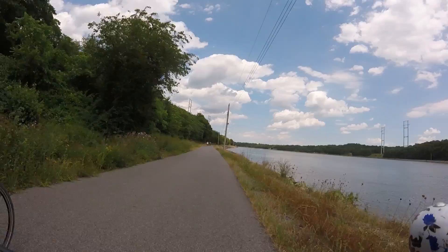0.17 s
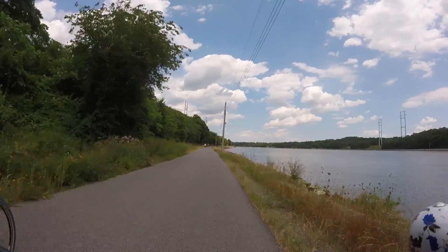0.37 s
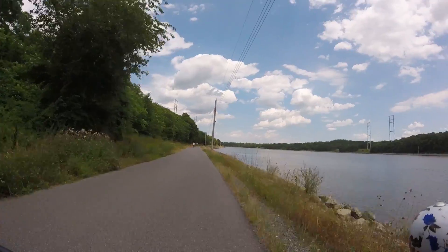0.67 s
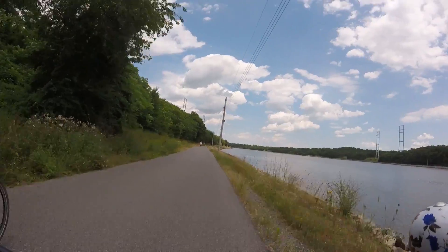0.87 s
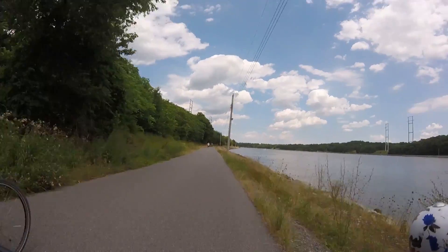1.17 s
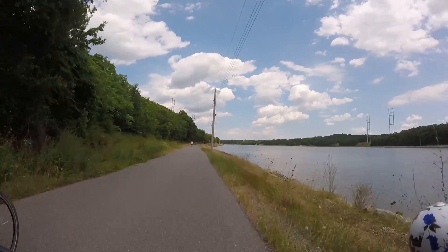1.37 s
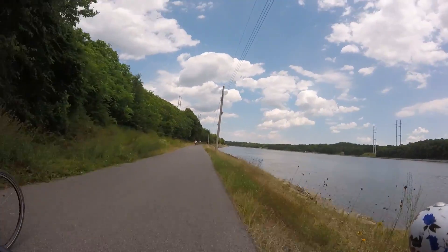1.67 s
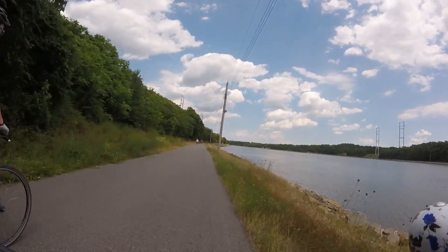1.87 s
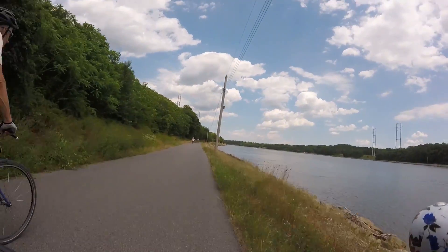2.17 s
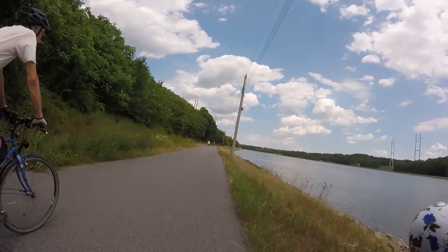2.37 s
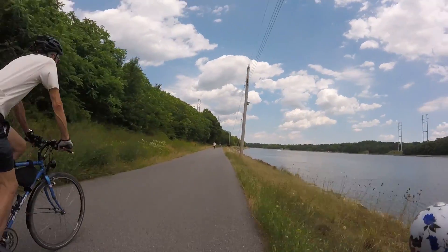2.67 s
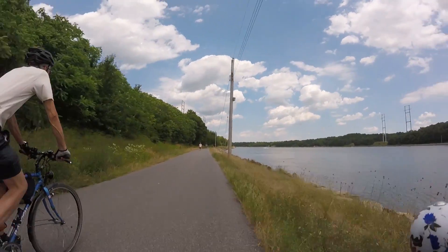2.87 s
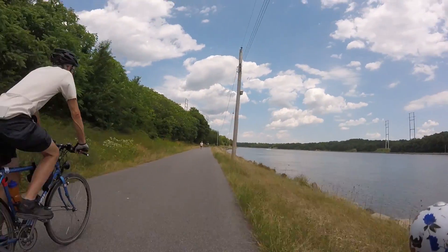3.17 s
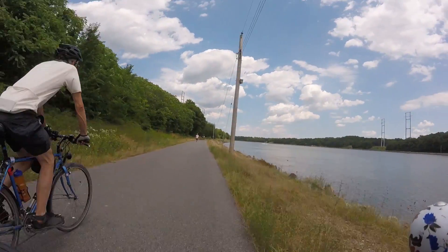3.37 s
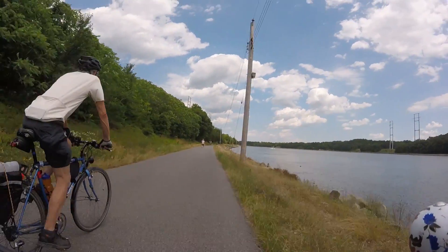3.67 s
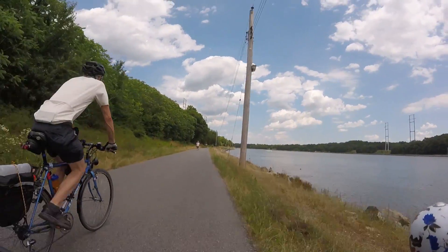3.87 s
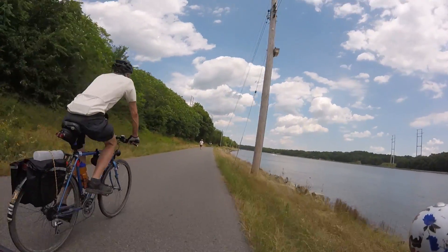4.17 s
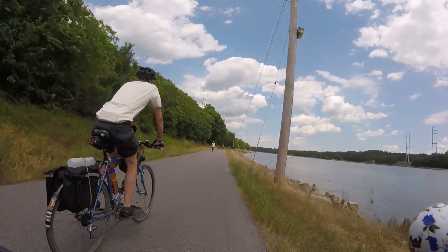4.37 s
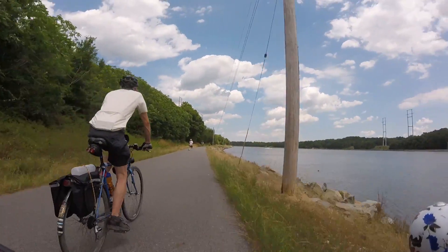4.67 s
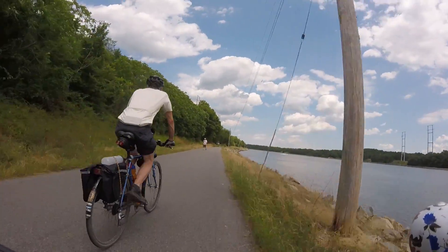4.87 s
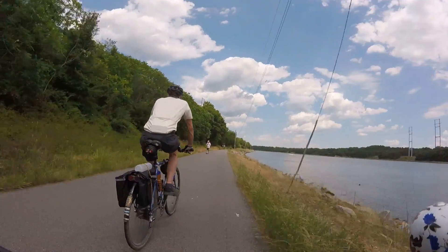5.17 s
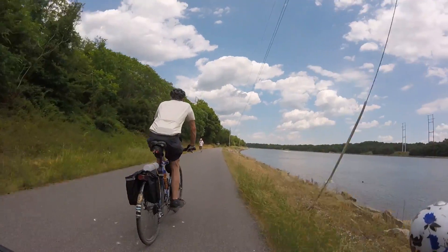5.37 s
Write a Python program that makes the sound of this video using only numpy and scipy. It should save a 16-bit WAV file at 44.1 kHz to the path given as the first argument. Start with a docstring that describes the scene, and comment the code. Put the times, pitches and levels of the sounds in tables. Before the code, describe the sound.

A bicycle rides along an asphalt path, heard from a microphone on the bike that is buffeted throughout by deep, uneven wind. The steady hum of the tyres comes through the frame underneath, with soft chain ticking and hiss and scattered small rattles. Two brief jolts come as the wheel crosses cracks, one early and one late, and in the second half a pedal clicks faintly with each turn.

```python
"""Low wind thumps and flutters right on the port of a microphone mounted on a moving bicycle. Under it the
tyres, rolling on smooth lakeside asphalt, hum through the frame and the mount. Close by, the chain sizzles and
ticks over the sprocket teeth and a loose fitting rattles. The frame takes a hard knock, the wheel jolts over a
crack, and in the second half a pedal clicks once a crank turn."""
import sys
import numpy as np
from scipy import signal
from scipy.fft import rfft, irfft
from scipy.io import wavfile
from scipy.ndimage import uniform_filter1d

SR = 44100
rng = np.random.default_rng(int(sys.argv[2]) if len(sys.argv) > 2 else 0)


def inscribe(sig):
    """Save sig as 16-bit PCM at rate SR to the path in sys.argv[1].

    A 1-D sig is mono; a 2-D sig holds one channel per row.
    Samples are clipped to [-1, 1] before scaling.
    """
    pcm = np.round(np.clip(np.atleast_2d(sig).T, -1, 1) * 32767)
    wavfile.write(sys.argv[1], SR, pcm.astype(np.int16))


N = 243873
TIME = np.arange(N) / SR

# Wind on the port between thumps. Each row: time in seconds, buffet, flutter and rush levels in dB.
WIND_LEVELS = [(0, -17, -28.5, -32.5), (.2, -25.5, -29, -44), (.35, -23.5, -22, -38),
               (.95, -13, -29.5, -35), (1.3, -23, -26.5, -39), (1.6, -21, -29.5, -39),
               (2.0, -19.5, -31.5, -42), (2.6, -20.5, -28.5, -39.5), (2.85, -19.5, -31, -43),
               (3.35, -19, -27.5, -39.5), (3.8, -18, -30, -41), (4.3, -20, -25, -34.5),
               (5.0, -22, -27.5, -41), (5.3, -20.5, -41.5, -48), (5.53, -21.5, -26, -44.5)]
# The wind's highest band between thumps. Each row: time in seconds, level in dB.
UPPER_RUSH_LEVELS = [(0.0, -42), (0.34, -47), (0.52, -43.5), (1.15, -42), (1.45, -44.5), (1.8, -42),
                     (1.96, -43), (2.2, -41.5), (2.39, -43), (2.59, -46), (3.73, -44), (4.28, -42.5),
                     (4.84, -45.5), (5.53, -44)]
# Four wind bands, deepest first. Each row: frequency in Hz, relative density in dB.
BUFFET_SPECTRUM = [(8, 8.5), (14, -3), (27, 2.5), (43, -2), (68, -12), (110, -25.5), (200, -90)]
FLUTTER_SPECTRUM = [(40, -15), (65, 7.5), (85, 1.5), (130, -9.5), (200, -67)]
RUSH_SPECTRUM = [(90, -7.5), (140, -0.5), (190, -6), (240, -12.5), (330, -28)]
UPPER_RUSH_SPECTRUM = [(150, -35), (215, -2.5), (320, -1.5), (430, -10), (700, -13.5)]
# Eddies hitting the port. Each row: centre and half length in seconds, pitch in Hz,
# then swing, flutter and rush levels in dB.
EDDIES = [(0.338, 0.013, 37, -12, -26, -32), (0.405, 0.013, 31, -10.5, -33, -27),
          (0.51, 0.015, 34, -14, -28, -52), (0.684, 0.027, 22, -19, -22.5, -30.5),
          (0.837, 0.028, 41, -13.5, -31, -39), (0.874, 0.013, 22, -15, -34, -52),
          (0.965, 0.025, 20.0, -11, -40, -45), (1.004, 0.036, 20, -16.5, -48, -28),
          (1.367, 0.014, 52, -11, -18, -42), (1.44, 0.013, 27, -12.5, -17, -37),
          (1.527, 0.013, 46, -13, -27, -50), (1.597, 0.015, 44, -15, -21, -48),
          (1.655, 0.029, 45.6, -14.4, -17.5, -42), (1.691, 0.027, 27, -12.5, -19.5, -29),
          (1.837, 0.021, 54, -19.5, -19, -40), (2.091, 0.028, 30.2, -13, -46, -58),
          (2.26, 0.017, 43, -14.5, -24, -29), (2.532, 0.015, 34, -18, -22, -35),
          (2.989, 0.015, 35.7, -6, -30, -51), (3.223, 0.019, 33.4, -8.5, -34, -53),
          (3.332, 0.018, 36.5, -10.5, -32, -48), (3.397, 0.015, 34.5, -8.5, -38, -46),
          (3.474, 0.018, 16.7, -12, -39, -42), (3.556, 0.028, 27.5, -13.5, -40, -39),
          (3.68, 0.015, 32, -9, -35, -29), (3.69, 0.025, 25.5, -12, -34, -27.5),
          (3.728, 0.024, 27.0, -11.1, -43, -45), (3.889, 0.025, 37.4, -14, -32, -33.5),
          (4.133, 0.02, 43, -18, -22, -31), (4.524, 0.017, 28, -11.5, -45, -31.5),
          (4.595, 0.02, 35, -18.0, -26, -49), (5.061, 0.026, 27, -18, -39, -35),
          (5.385, 0.018, 37, -18.5, -44, -56)]

# The rolling bicycle. Each row: time in seconds, tyre hum level and chain reference level in dB.
ROLLING_LEVELS = [(0, -32.5, -61), (.35, -33.5, -65), (.7, -34.5, -69.5), (1.05, -33, -71),
                  (1.3, -33.5, -63), (1.75, -34.5, -69), (2.5, -34, -65.5), (3.0, -35, -72.5),
                  (3.5, -34, -69), (4.0, -34, -73), (4.5, -33, -66), (4.75, -33.5, -68), (5.0, -34.5, -72),
                  (5.25, -35, -76), (5.53, -33, -66)]
# Resonances of frame and mount, of the frame's strongest pair, and of thin fittings.
# Each row: frequency in Hz, width in Hz, relative gain in dB.
FRAME_MODES = [(517.8, 42, -3.5), (569, 75, -10), (637, 91, 0), (848, 57, -3), (917.6, 75, -2.5),
               (983, 147, -4), (1078.4, 61, -8), (1310, 110, -15), (1566, 150, -20.5)]
FRAME_TONE_MODES = [(743, 40.4, 1), (783, 44, 0)]
FITTING_MODES = [(1960, 76, -1), (2223, 440, -1.5), (2732, 295, 3), (3350, 740, -4.5), (3746, 390, -4)]
# Tone of that strongest pair, and tread hiss. Each row: time in seconds, level in dB.
FRAME_TONE_LEVELS = [(0.0, -42), (0.12, -34), (0.49, -38.5), (0.51, -35), (0.82, -42), (0.88, -36),
                     (1.48, -35), (1.52, -29.5), (1.56, -33.5), (1.82, -39), (2.05, -32), (2.11, -39.5),
                     (2.29, -36), (2.32, -29.5), (2.42, -45), (2.45, -34.5), (3.11, -41), (3.13, -36),
                     (3.4, -40.5), (3.42, -45), (3.49, -35.5), (4.03, -38), (4.07, -45), (4.1, -32.5),
                     (4.34, -36.5), (4.85, -34.5), (5.08, -41), (5.1, -33), (5.44, -36.5), (5.53, -38)]
TREAD_LEVELS = [(0.0, -53), (0.98, -55.5), (1.2, -53.5), (1.88, -56.5), (2.68, -54), (2.86, -56),
                (4.31, -56), (4.5, -54), (4.91, -56.5), (5.53, -54.5)]

# Chain travel over the sprocket. Each row: time in seconds, teeth passed.
CHAIN_TRAVEL = [(0, -.01), (.9, 20.43), (2.1, 47.78), (3.6, 82.3), (5.53, 126.5)]
# The crispest chain ticks. Each row: start in seconds, level in dB.
CHAIN_SNAPS = [(0.0638, -49), (0.2628, -59), (0.3496, -63), (0.4389, -59), (0.5192, -53), (0.6125, -60),
               (0.6574, -54), (0.6853, -57), (0.6996, -50), (0.7462, -57), (0.7991, -52), (0.8345, -58),
               (0.8659, -58), (0.8789, -55), (0.9218, -59), (0.9677, -54), (1.0116, -54), (1.0515, -54),
               (1.2181, -53), (1.2945, -56), (1.3119, -54), (1.3513, -56), (1.5369, -56), (1.6761, -59),
               (1.7584, -53), (1.8312, -57), (2.0438, -59), (2.0622, -52), (2.1066, -55), (2.1505, -59),
               (2.4144, -56), (2.4448, -59), (2.6748, -62), (2.7177, -58), (2.9677, -55), (3.057, -58.5),
               (3.194, -54), (3.2864, -52), (3.3393, -55), (3.4087, -61), (3.42, -57), (3.456, -61),
               (3.6077, -50.5), (3.7005, -54), (3.7304, -57), (3.7444, -57), (4.125, -60), (4.3894, -58),
               (4.5171, -54), (4.5665, -54), (4.6049, -59), (4.799, -58)]
# Edges in Hz of the chain's treble bands.
CHAIN_EDGES_HZ = [3000, 5500, 7500, 9000, 10500, 12000, 13300, 15000]
# Metal noises of chain, fitting and pedal. Each row: frequency in Hz, relative density in dB.
TICK_SPECTRUM = [(4000, -17), (6000, 13), (8000, 0), (11000, -2), (13500, -4), (14800, -11)]
SNAP_SPECTRUM = [(3500, -24), (5000, -5), (6500, 6), (8000, -5), (11000, -1.5), (13500, -1), (14800, -6)]
HISS_SPECTRUM = [(2470, -30), (4200, -8), (5400, -1.5), (6130, -2), (6480, -2), (7800, -8.5), (8500, -16),
                 (11000, -30), (18700, -120)]
SIZZLE_SPECTRUM = [(6500, -7), (7800, -4), (9300, -6), (10700, -1.5), (12500, -8.5), (13600, -1),
                   (14800, -33)]
WHIRR_SPECTRUM = [(6500, -11), (7800, -4), (9500, 1), (11000, 0), (12300, -8), (13200, -30)]
RUB_SPECTRUM = [(4000, -15), (4700, -3), (6000, -1), (7200, -7), (8500, -27)]

# Knocks of the loose fitting. Each row: time in seconds, then blow, bright crack,
# extra on the low modes and extra on the high modes, all in dB.
KNOCKS = [(1.2574, -62, -62, -4, -3), (1.293, -63, -63, 1, 0), (1.367, -57, -51, 6, 7),
          (1.963, -57.5, -65, 5, -1), (2.309, -63, -66, 2, 0), (2.631, -64, -61, 9, 0),
          (3.0566, -58, -71, 9.5, -9), (3.1555, -60, -65, 8, 13), (3.2876, -50.5, -61, 4.5, -6),
          (3.3393, -57, -52, 10.5, -2), (3.383, -62, -58, -2, 2), (3.531, -58.5, -77, -5, 19),
          (3.552, -65, -69, 2, 2), (3.56, -48.5, -67, -2, 21), (3.565, -72, -70, -3, 0),
          (3.6008, -58, -57, -9, -3), (3.75, -64, -52, -5, 0), (3.906, -58, -67, -10, 14),
          (4.051, -60.5, -74, 3, -3), (4.088, -67, -70, 13, -3), (4.4255, -59, -64, 4, -3),
          (4.5759, -58.5, -56, -4, -3), (4.606, -62, -57, -3, -5), (4.633, -59, -53, -3, -5),
          (4.6849, -55.5, -64, -3, -2), (4.837, -58, -68, -5, -6)]
# Hard blows on the frame: a knock near 1.26 s, then the wheel meeting a crack and rebounding. Each row: start
# in seconds, blow in dB, contact cutoff in Hz.
FRAME_BLOWS = [(1.2591, -35, 1500), (4.09, -31.5, 2430), (4.0985, -33, 1000)]
# Pedal clicks. Each row: start and swell time in seconds, rub level and ringing drive in dB.
PEDAL_CLICKS = [(2.441, 0.0025, -65, -59.5), (3.291, 0.0017, -61, -56), (4.122, .002, -60, -72),
                (4.133, 0.0022, -67, -63), (5.003, 0.019, -56, -82)]
# Ringing of the loose fitting, the jolted frame and the pedal.
# Each row: frequency in Hz, gain in dB, time to fall 60 dB in seconds.
KNOCK_MODES = [(1580, 0.5, 0.023), (2230, -1, 0.012), (2530, 5, 0.014), (2788, 7, 0.012),
               (3695, 2.5, 0.018), (4590, -20, 0.0083), (4810, -29, 0.007)]
JOLT_MODES = [(320, -12.5, 0.033), (530, -44, 0.027), (690, -40, 0.034), (772, -12.5, 0.032),
              (945, -10, 0.021), (1050, -25, 0.022), (1290, -22.5, 0.059), (1450, -32.5, 0.052),
              (2120, -22, 0.021), (2700, -30, .012)]
CLICK_MODES = [(6330, 0.5, 0.014), (6700, -13, 0.056)]


def wind():
    """Right at the microphone, big eddies thump the port with a pitched swing; small ones flutter."""
    upper_offset_db, buffet_duck = -10.5, 0.77
    band_power = from_db(in_time(WIND_LEVELS) + in_time(UPPER_RUSH_LEVELS)) ** 2
    swings, covered = 0, 0
    for at, half_s, hz, swing_db, flutter_db, rush_db in EDDIES:
        shape = np.exp(-((TIME - at) / half_s) ** 2)
        swing = np.sin(2 * np.pi * (hz * (TIME - at) + rng.random()))
        swings += from_db(swing_db) * np.sqrt(2 * shape) * swing
        covered = np.maximum(covered, np.sqrt(shape))   # the swing displaces the steady buffet
        band_power[1:] += from_db([flutter_db, rush_db, rush_db + upper_offset_db])[:, None] ** 2 * shape
    buffet = (1 - buffet_duck * covered) * evened(coloured(BUFFET_SPECTRUM), seconds=0.11, share=0.45)
    flutter = evened(coloured(FLUTTER_SPECTRUM), seconds=0.061, share=0.2)
    rush = from_db(0.5 * drift(9.5)) * evened(coloured(RUSH_SPECTRUM), seconds=0.057, share=0.11)
    upper_rush = evened(coloured(UPPER_RUSH_SPECTRUM), seconds=0.016, share=0.36)
    return swings + np.sum(np.sqrt(band_power) * [buffet, flutter, rush, upper_rush], axis=0)


def tyres(hum_db):
    """Asphalt grain hums up through the frame to the microphone and hisses in the thin fittings."""
    hum = evened(resonant_noise(FRAME_MODES, waver_db=1.13, waver_hz=5.1), seconds=0.073, share=0.1)
    tone = evened(resonant_noise(FRAME_TONE_MODES, waver_db=1, waver_hz=6.5), seconds=0.099, share=1)
    tread = resonant_noise(FITTING_MODES, waver_db=1.5, waver_hz=79)
    tone_db = in_time(FRAME_TONE_LEVELS)[0]
    tread_db = in_time(TREAD_LEVELS)[0] + drift(4.8)
    return from_db(hum_db) * hum + from_db(tone_db) * tone + from_db(tread_db) * tread


def chain_ticks(chain_db):
    """Each roller ticks onto a tooth, with a weaker tick half-way to the next; crisp snaps stand out."""
    tooth_db, halfway_db, spread_db, slack_s = 9, 8, 3.5, 0.0013
    times, teeth = np.transpose(CHAIN_TRAVEL)
    half_steps = np.arange(1, 252)
    timing, force = rng.standard_normal((len(half_steps), 2)).T
    starts = np.interp(half_steps / 2, teeth, times) + slack_s * timing
    tick_db = np.where(half_steps % 2, halfway_db, tooth_db) + spread_db * force
    steady = from_db(chain_db) * bursts(starts, tick_db, coloured(TICK_SPECTRUM), t60=0.013)
    snap_noise = evened(coloured(SNAP_SPECTRUM), seconds=0.002, share=0.6)
    return steady + bursts(*np.transpose(CHAIN_SNAPS), snap_noise, t60=0.028)


def chain_sizzle(chain_db):
    """Random flicker roughens a hiss and a clustered sizzle over an even whirr."""
    flickers_per_s, spread_db, patch_db, sizzle_offset_db = 150, 2.5, 2.5, -7
    bands = in_bands(coloured(SIZZLE_SPECTRUM))
    contacts = rng.random((len(bands) + 1, N)) < flickers_per_s / SR
    force = from_db(spread_db * rng.standard_normal(N))
    hiss_flicker, *band_flickers = 1 + dying(contacts * force, t60=0.0088)
    hiss_db = -64 - 0.74 * TIME + drift(35)   # hiss and whirr both fade slowly
    hiss = from_db(hiss_db) * hiss_flicker * coloured(HISS_SPECTRUM)
    sizzle = sum(from_db(patch_db * drift(30)) * flicker * band
                 for flicker, band in zip(band_flickers, bands))
    sizzle_db = chain_db + sizzle_offset_db + 1.5 * drift(7.4) + 2 * drift(34)
    whirr_db = -78 - 0.7 * TIME + 1.2 * drift(25)
    return hiss + from_db(sizzle_db) * sizzle + from_db(whirr_db) * coloured(WHIRR_SPECTRUM)


def loose_fitting():
    """A nearby fitting knocks, rebounds and thuds into the frame, with faint chatter throughout."""
    lag_s, rebound_s, rebound_db, thud_db = 0.000797, 0.00165, -10.5, -2
    low_hz, high_hz, chatter_per_s = 2300, 4000, 40
    times, knock_db, crack_db, low_db, high_db = np.transpose(KNOCKS)
    starts = times + lag_s
    contacts = rng.random(N) < chatter_per_s / SR
    chatter = contacts * from_db(-88 + 3.7 * np.minimum(rng.exponential(1, N), 2))
    ringing = 0
    for hz, mode_db, t60 in KNOCK_MODES:
        # Each knock lands on its own spot and favours different modes.
        blow_db = knock_db + low_db * (hz < low_hz) + high_db * (hz > high_hz)
        blows = clicks_at(starts, blow_db) - clicks_at(starts + rebound_s, blow_db + rebound_db)
        ringing += from_db(mode_db) * ring(blows + chatter, hz, t60)
    crack = dying(clicks_at(starts, crack_db), t60=0.026) * coloured(HISS_SPECTRUM)
    thud = ring(soft(clicks_at(starts, knock_db + thud_db), cutoff_hz=1500), hz=1095, t60=0.047)
    return soft(ringing, cutoff_hz=5500) + crack + thud


def frame_blows():
    """A hard knock and a crack in the asphalt jolt the frame under the microphone."""
    blows = sum(soft(clicks_at([start], db), cutoff_hz) for start, db, cutoff_hz in FRAME_BLOWS)
    return -strike(blows, JOLT_MODES)


def pedal():
    """Down at the crank, a short rub swells, dies and sets a high part ringing."""
    rub, drive = 0, 0
    for start, swell_s, rub_db, drive_db in PEDAL_CLICKS:
        age = np.maximum(TIME - start, 0) / swell_s
        shape = age * np.exp(1 - age)
        rub += from_db(rub_db) * shape
        drive += from_db(drive_db) * shape
    return rub * coloured(RUB_SPECTRUM) + strike(drive * rng.standard_normal(N), CLICK_MODES)


def from_db(db):
    """Decibels to gain."""
    return 10 ** (np.asarray(db) / 20)


def rms_one(x):
    """Scale to unit rms."""
    return x / np.sqrt(np.mean(x ** 2) + 1e-20)


def in_time(rows):
    """One curve per column after the time column, one value a sample."""
    times, *columns = np.transpose(rows)
    return [np.interp(TIME, times, column) for column in columns]


def drift(hz):
    """Random wander, mostly slower than hz; rms 1."""
    hop, settle = 40, 2000
    pole = np.exp(-2 * np.pi * hz * hop / SR)
    white = rng.standard_normal(N // hop + settle + 2)
    slow = signal.lfilter([1], [1, -2 * pole, pole * pole], white)[settle:]
    return np.interp(np.arange(N) / hop, np.arange(len(slow)), rms_one(slow))


def coloured(spectrum):
    """Noise with a given spectrum; rms 1."""
    hz, db = np.transpose(spectrum)
    bin_hz = np.maximum(np.arange(N // 2 + 1) * SR / N, 1)
    gain = from_db(np.interp(np.log(bin_hz), np.log(hz), db, left=-60, right=-90))
    return rms_one(irfft(rfft(rng.standard_normal(N)) * gain, N))


def evened(x, seconds, share):
    """Even out a share of the chance swells; rms 1."""
    local_power = uniform_filter1d(x ** 2, int(seconds * SR)) + 1e-9
    return rms_one(x / local_power ** (share / 2))


def resonant_noise(modes, waver_db, waver_hz):
    """Rough contact noise through parallel steep resonances, each wavering in level; rms 1."""
    white, out = rng.standard_normal((2, N)), 0
    for k, (hz, width, db) in enumerate(modes):
        r = np.exp(-np.pi * width / SR)
        section = [(1 - r * r) / 2, 0, (r * r - 1) / 2, 1, -2 * r * np.cos(2 * np.pi * hz / SR), r * r]
        out += from_db(db + waver_db * drift(waver_hz)) * signal.sosfilt([section] * 2, white[k % 2])
    return rms_one(out)


def clicks_at(starts, db):
    """Single-sample clicks at times in seconds."""
    out = np.zeros(N)
    out[np.clip(np.round(np.asarray(starts) * SR).astype(int), 0, N - 1)] = from_db(db)
    return out


def soft(clicks, cutoff_hz):
    """A yielding contact has no treble; the gain keeps a click near its height."""
    lowpass = signal.butter(6, cutoff_hz, fs=SR, output="sos")
    return signal.sosfilt(lowpass, clicks + 1e-18) * SR / (2 * cutoff_hz)


def ring(clicks, hz, t60):
    """A unit click sets a sine of height 1 ringing."""
    r, w = from_db(-60 / (t60 * SR)), 2 * np.pi * hz / SR
    return signal.lfilter([0, np.sin(w)], [1, -2 * r * np.cos(w), r * r], clicks + 1e-18)


def strike(drive, modes):
    """All modes of a body ring from one drive."""
    return sum(from_db(db) * ring(drive, hz, t60) for hz, db, t60 in modes)


def dying(clicks, t60):
    """An envelope that jumps at each click and dies away."""
    return signal.lfilter([1], [1, -from_db(-60 / (t60 * SR))], clicks + 1e-18)


def in_bands(x):
    """The chain's treble, split into neighbouring bands."""
    hz, spectrum = np.arange(N // 2 + 1) * SR / N, rfft(x)
    return [irfft(spectrum * (hz >= low) * (hz < high), N)
            for low, high in zip(CHAIN_EDGES_HZ, CHAIN_EDGES_HZ[1:])]


def bursts(starts, db, noise, t60, colour_db=3.5):
    """Dying bursts of noise, each with its own random balance of bands."""
    bands = in_bands(noise)
    colours = colour_db * rng.standard_normal((len(starts), len(bands)))
    return sum(dying(clicks_at(starts, db + colour), t60) * band
               for colour, band in zip(colours.T, bands))


def scene():
    """Wind and bicycle, all close to one microphone riding along."""
    hum_db, chain_db = in_time(ROLLING_LEVELS)
    mix = wind() + tyres(hum_db) + chain_ticks(chain_db) + chain_sizzle(chain_db)
    return (mix + loose_fitting() + frame_blows() + pedal())[None]


def record(dry):
    """A steep low-pass takes off the highest treble."""
    stopband_db, stopband_hz = 70, 14870
    return signal.sosfilt(signal.cheby2(12, stopband_db, stopband_hz, fs=SR, output="sos"), dry)


dry = scene()
out = record(dry)
inscribe(out)
```